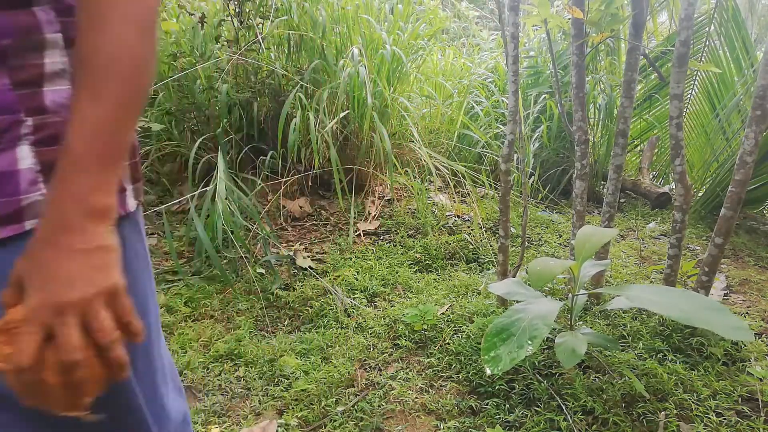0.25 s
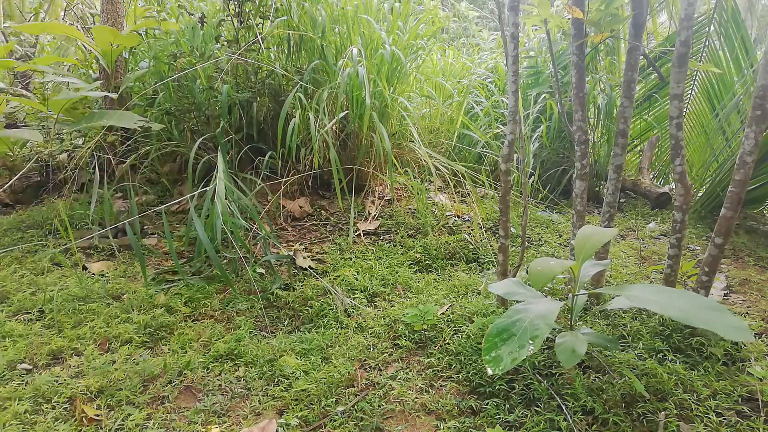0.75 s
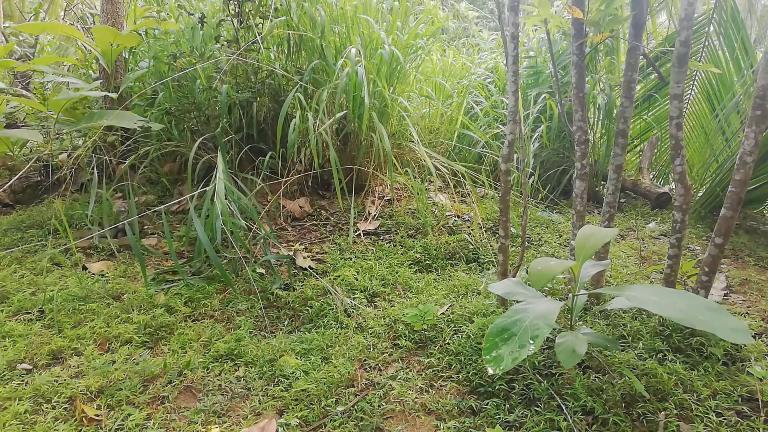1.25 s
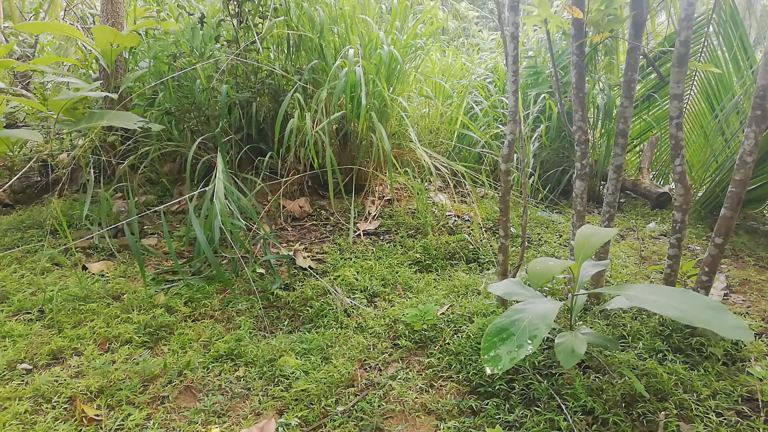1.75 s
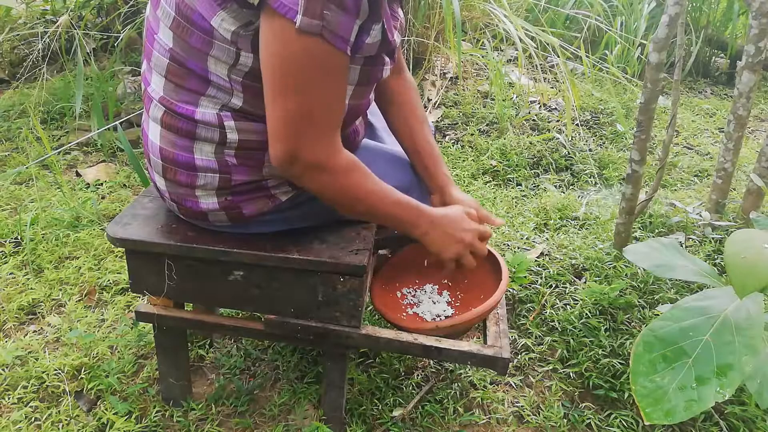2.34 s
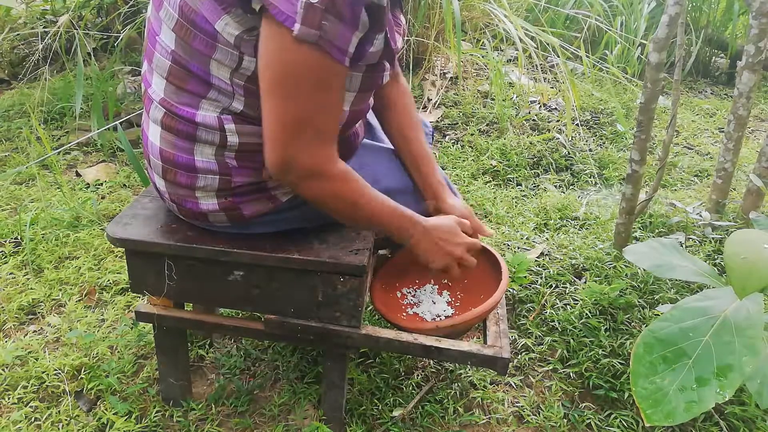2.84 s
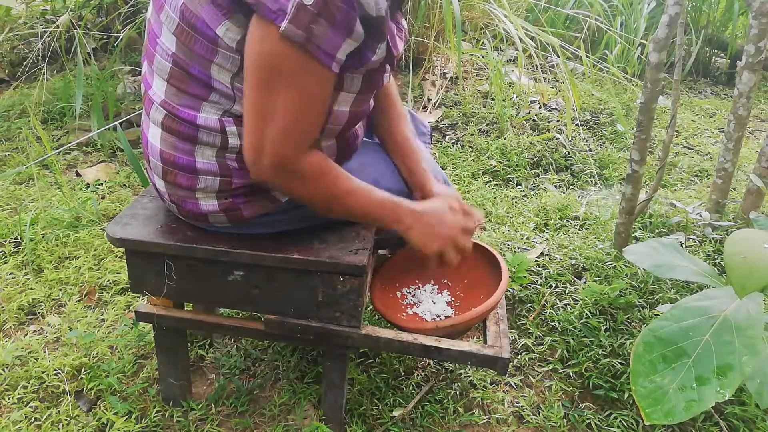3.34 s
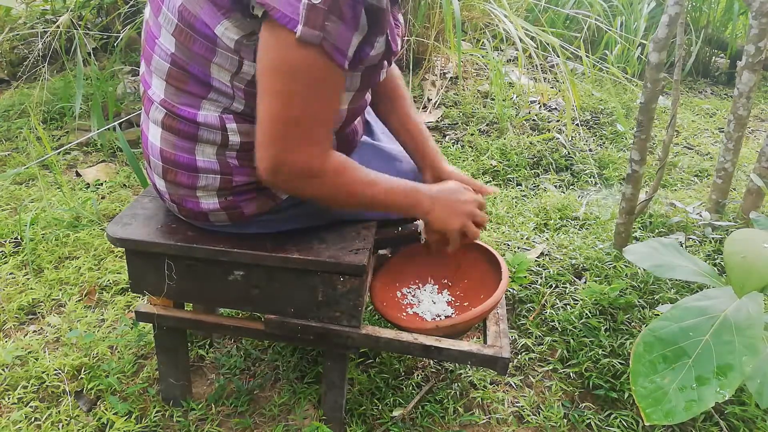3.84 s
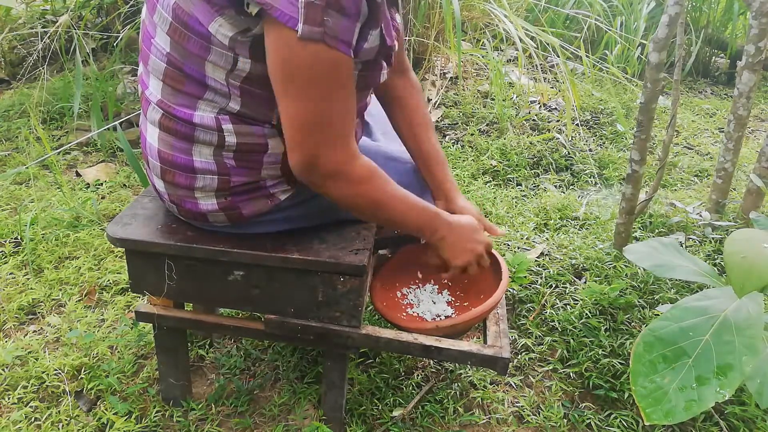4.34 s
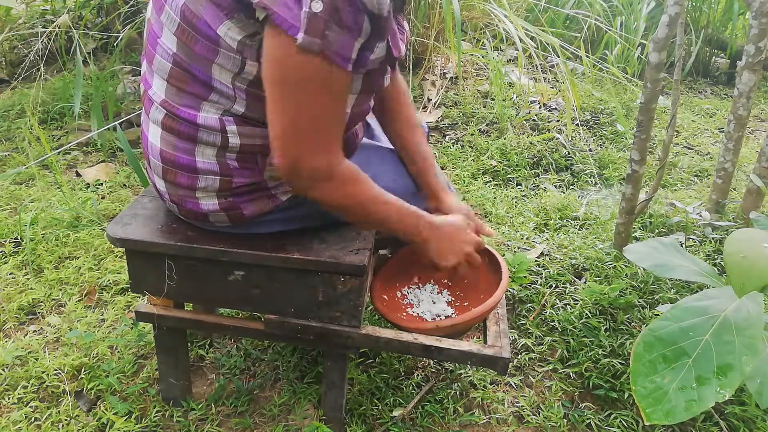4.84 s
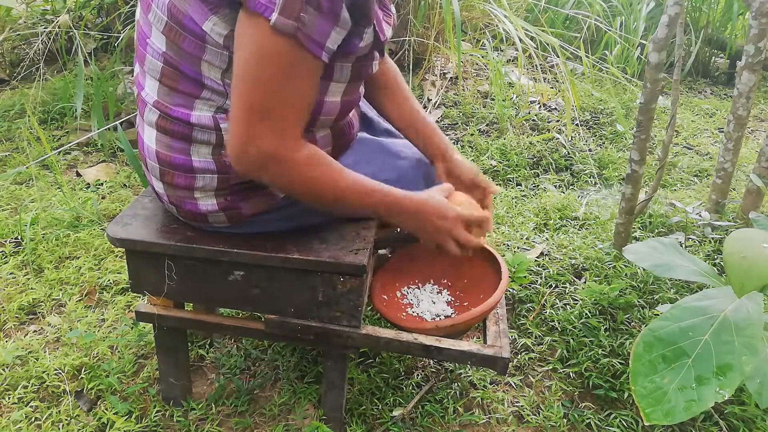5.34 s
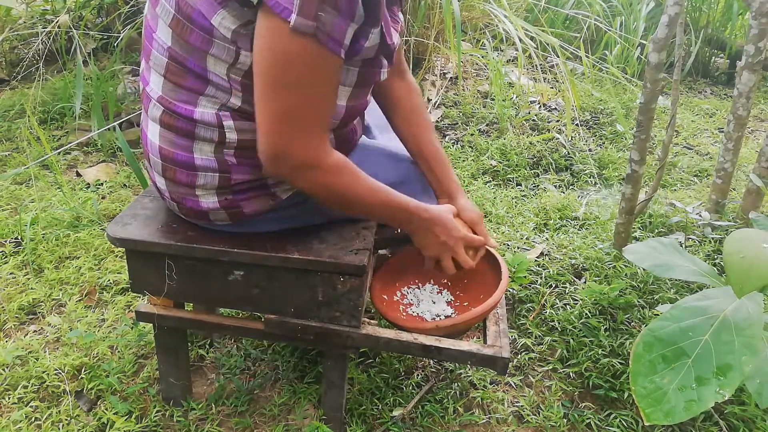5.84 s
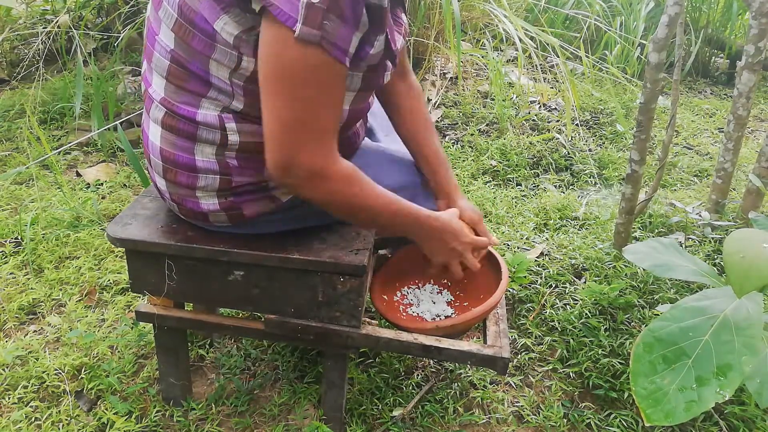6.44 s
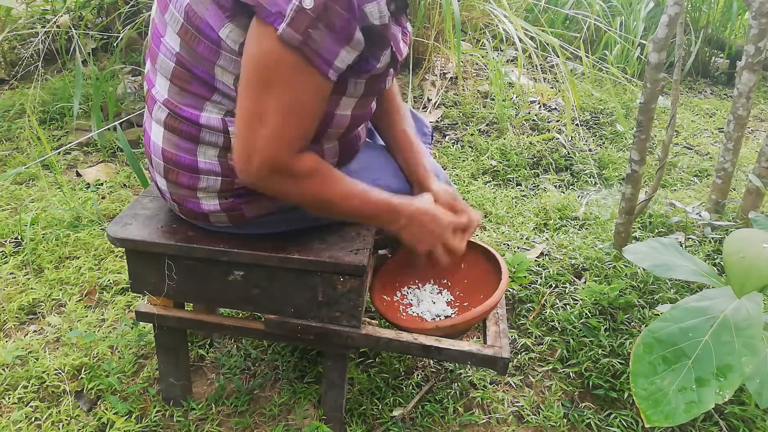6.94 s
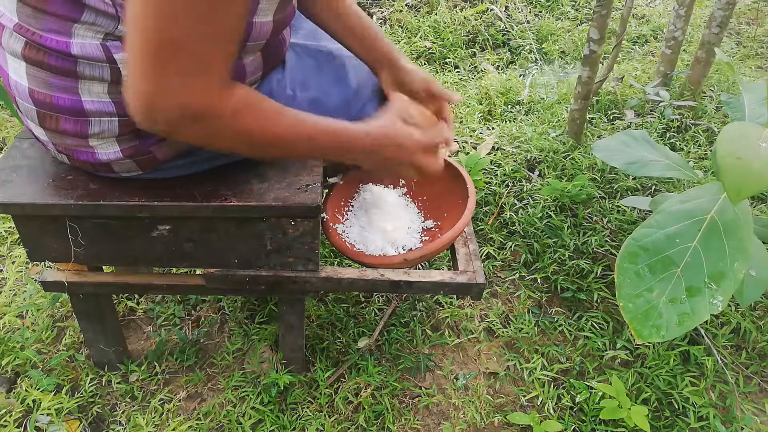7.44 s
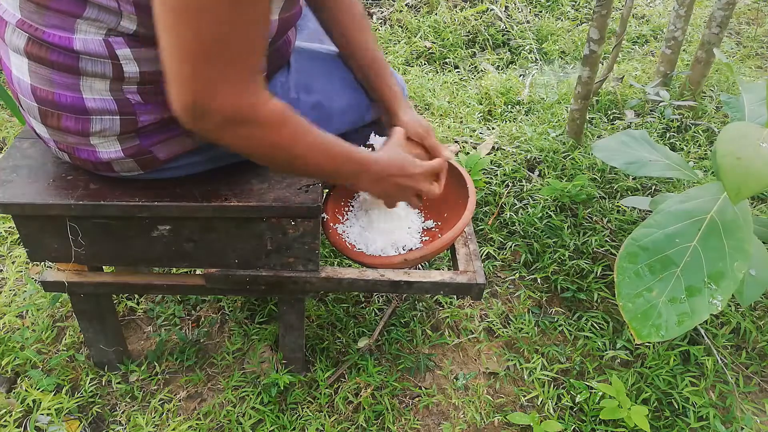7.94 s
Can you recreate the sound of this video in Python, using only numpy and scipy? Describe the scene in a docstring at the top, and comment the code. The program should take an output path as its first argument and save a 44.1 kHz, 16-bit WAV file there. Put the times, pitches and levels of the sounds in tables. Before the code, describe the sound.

A coconut half is grated on a toothed blade in steady rasping strokes with small knocks, over faint garden air.

```python
"""Half a coconut is grated on the toothed blade of a low wooden bench, about 3.5 strokes a second, in
three bouts. Fibres fracture in a dense train of impulses, coloured by the resonances of shell, blade and
bench. In each stroke the shell touches the teeth, the bench shudders and the blade judders with a knock;
harder strokes bite sooner. Twice the slipping shell squeaks. Before the work, steps rustle in the grass;
the garden's low rumble, leaf hiss and thin far whistles lie behind."""
import sys
import numpy as np
from scipy import signal
from scipy.fft import rfft, irfft, next_fast_len
from scipy.io import wavfile
from scipy.ndimage import uniform_filter1d

SR = 44100
rng = np.random.default_rng(int(sys.argv[2]) if len(sys.argv) > 2 else 0)


def generate_wav(sig):
    """Save sig (samples, or channels by samples) to the path in sys.argv[1] as 16-bit PCM at SR."""
    pcm = np.round(np.clip(np.atleast_2d(sig).T, -1, 1) * 32767).astype(np.int16)
    wavfile.write(sys.argv[1], SR, pcm)


N = 361619
T = np.arange(N) / SR
FFT_SIZE = next_fast_len(N + 8192)
FFT_SIZE += FFT_SIZE % 2
HZ = np.maximum(np.arange(FFT_SIZE // 2 + 1) * SR / FFT_SIZE, 1)


def undb(db):
    """Amplitude ratio of a level."""
    return 10 ** (np.asarray(db) / 20)

def unit(x):
    """Normalisation to rms 1."""
    return x / np.sqrt(np.mean(x ** 2))

def bell(s, width_s):
    """Gaussian envelope centred on time s."""
    return np.exp(-((T - s) / width_s) ** 2)

def curve(points):
    """Interpolation of (f/Hz, value) points in log frequency."""
    hz, value = np.transpose(points)
    return np.interp(np.log(HZ), np.log(hz), value)

def filtered(x, gain):
    """Linear filtering as a product of spectra."""
    return irfft(rfft(x, FFT_SIZE) * gain, FFT_SIZE)[..., :N]

def lowpass(hz, order=4):
    """Low-pass magnitude response."""
    return 1 / (1 + (HZ / hz) ** order)

def spread(pair, correlation):
    """Sum and difference of two independent signals set the left-right correlation."""
    c = np.clip(curve(correlation), -1, 1)
    mid, side = filtered(pair, np.sqrt(np.array([1 + c, 1 - c]) / 2))
    return np.array([mid + side, mid - side])

def sides(pan_db):
    """Channel gains for a pan, the level difference left minus right."""
    return undb(np.array([[1], [-1]]) * pan_db / 2)

def add(out, s, sound):
    """Superposition of a sound starting at time s."""
    i = int(s * SR)
    out[..., i:i + sound.shape[-1]] += sound[..., :N - i]

def wander(rate):
    """Random modulation: values held 1 / rate s and smoothed twice, deviation near 1."""
    hold = max(int(SR / rate), 1)
    held = np.repeat(rng.standard_normal(N // hold + 1), hold)
    return 1.32 * uniform_filter1d(uniform_filter1d(held, hold), hold)[:N]

def shot_noise(rate, scatter_db):
    """Two independent Poisson trains of snaps of uneven size."""
    snaps = rng.random((2, N)) < rate / SR
    size = undb(scatter_db * np.minimum(rng.exponential(size=(2, N)), 4))
    return unit(snaps * size * np.sign(rng.standard_normal((2, N))))

def mode(t, hz, t60):
    """Free vibration of a damped oscillator, falling 60 dB in t60 seconds."""
    return np.sin(2 * np.pi * hz * t) * np.exp(-np.log(1000) * t / t60)


# spectrum of the garden air: f/Hz, relative level/dB
AIR_SPECTRUM = [(25, -6.5), (45, 1), (85, 1.5), (165, -7), (270, -15.5), (500, -16), (800, -13.5),
                (1600, -17), (4300, -20), (6000, -23.5), (8300, -24), (11000, -29), (15500, -36)]
# its left-right likeness: f/Hz, correlation
AIR_CORRELATION = [(110, 1), (210, 0.94), (380, 0.21), (650, -0.64), (1300, -0.088)]
# its balance: f/Hz, pan/dB
AIR_PAN = [(380, 0), (700, 4), (1250, -1), (4400, 2), (8200, 4.5), (12000, -3)]
# steady stretches: start t/s, rumble level/dB, hiss level/dB
GARDEN_LEVELS = [(0, -58.5, -59), (1.976, -57.5, -56.5), (3.4, -55.5, -55), (5.1, -57.2, -55),
                 (7.35, -58, -59)]

def garden(crossover_hz=260, dip_s=1.976, dip_width_s=0.006, dip_db=-44):
    """Modulated broadband noise: a restless rumble under leaf hiss. The level dips briefly once."""
    starts, rumble_db, hiss_db = np.transpose(GARDEN_LEVELS)
    stretch = np.searchsorted(starts[1:], T)
    air = spread(rng.standard_normal((2, N)), AIR_CORRELATION)
    colour = undb(curve(AIR_SPECTRUM)) * sides(curve(AIR_PAN))
    low = lowpass(crossover_hz)
    rumble = unit(filtered(air, colour * low)) * undb(rumble_db[stretch] + 1.3 * wander(12))
    hiss = unit(filtered(air, colour * (1 - low))) * undb(hiss_db[stretch] + 0.36 * wander(5.6))
    return (rumble + hiss) * undb(dip_db * bell(dip_s, dip_width_s))


# rustles underfoot: t/s, width/s, level/dB
FOOTSTEPS = [(.025, 0.0067, -56.5), (0.591, .04, -66), (.933, 0.0066, -53), (.95, .025, -61.5),
             (1.2, .05, -60.5)]

def steps():
    """Band-limited shot noise: grass blades crackle faintly underfoot."""
    swell = sum(undb(db) * bell(s, width) for s, width, db in FOOTSTEPS)
    band = lowpass(11000) * (1 - lowpass(4800, order=2))
    return swell * unit(filtered(shot_noise(rate=1000, scatter_db=3.5), band))


# strokes: knock t/s, force level/dB, lag from knock to fastest tearing/s, rasp level/dB
STROKES = [(2.2801, -9, .006, -40.5), (2.561, -10.5, 0.0039, -39.5), (2.8439, -4.5, -0.0051, -39),
           (3.1051, -7.5, .018, -37.5), (3.383, -6.5, 0.013, -37.5), (3.6558, -1.5, 0.019, -38.5),
           (3.9452, -.5, 0.016, -38), (4.2323, -8, 0.039, -38.5), (4.5139, 0.5, 0.025, -39),
           (4.797, 0.5, 0.024, -39.5), (5.5514, -11, -0.03, -39), (5.8165, -10.5, 0.004, -39),
           (6.0884, -4.5, 0.016, -38.5), (6.3893, .5, 0.00027, -38.5), (6.6772, -1, 0.0068, -38.5),
           (6.9891, 3.5, -0.00088, -38.5), (7.6225, -10, -0.02, -42.5), (7.916, -25, -.013, -42.5),
           (8.1773, -2.5, 0.016, -41.5)]
# bouts: start t/s, stroke length/s, relative treble level/dB, relative bass level/dB,
# shudder level/dB, lead of shudder over knock/s, knock pan/dB
BOUTS = [(2.1, 0.16, -8, -2, -25, .011, 5), (5.3, 0.16, -9.5, -3, -34.5, .02, 5),
         (7.4, 0.18, -3, 2.5, -39, .006, 9)]

def rasp(tooth_hz=300, tooth_db=1.87, bass_lead_s=0.008, bite_power=2.43, level_db=4.5, treble_lift_db=9):
    """Fracture as amplitude-modulated shot noise: fibres snap in clusters as the teeth catch."""
    low, mid, high, stall_db = np.zeros((4, N))
    for knock_s, force_db, lag_s, db, (length_s, treble_db, bass_db, *_) in strokes():
        # the harder the stroke, the quicker the teeth bite and the more gradually they let go
        rise_s = length_s * np.clip(0.29 - 0.05 * force_db, .1, .5)
        peak_s, fall_s = knock_s + lag_s, length_s - rise_s
        biting = np.clip((peak_s - T) / rise_s, 0, 3) ** bite_power
        releasing = np.clip((T - peak_s) / fall_s, 0, 3) ** 2
        swing_db = -20 * (biting + releasing)
        low += undb(db + bass_db + 1.09 * swing_db)
        mid += undb(db + swing_db)
        high += undb(db + treble_db + 1.01 * swing_db)
        # the tearing stalls while the blade judders
        stall_db -= 7.5 * undb(force_db) * bell(knock_s + 0.0055, width_s=0.0038)
    low = np.interp(T + bass_lead_s, T, low)  # the bench feels the push before the tearing peaks
    catch_db = .7 * wander(90)
    snaps = turning_shell(shot_noise(rate=12000, scatter_db=1.5))
    snaps *= undb(tooth_db * wander(tooth_hz) + catch_db)
    bass, body = lowpass(830), lowpass(7000)
    thrum = low * filtered(snaps, bass)
    scrape = mid * undb(0.46 * stall_db) * filtered(snaps, body - bass)
    crackle = high * undb(stall_db) * filtered(snaps, 1 - body)
    return undb(level_db) * (thrum + scrape + undb(treble_lift_db) * crackle)

def strokes():
    """Each stroke's row, then its bout's stroke length, brightness, bass, shudder and pan."""
    bout = np.searchsorted([row[0] for row in BOUTS], [row[0] for row in STROKES]) - 1
    return [(*stroke, BOUTS[k][1:]) for stroke, k in zip(STROKES, bout)]

def turning_shell(x, depth_db=3.0):
    """Time-varying filtering: narrow resonances come and go as the shell turns in the hands."""
    spectra = signal.stft(x, nperseg=512)[2]
    ripple = uniform_filter1d(rng.standard_normal(spectra.shape[1:]), size=3, axis=0)  # over frequency
    ripple = uniform_filter1d(ripple, size=7, axis=1)  # over time
    return signal.istft(spectra * undb(depth_db * unit(ripple)))[1][:, :N]


# spectrum of tearing flesh: f/Hz, level/dB
TEAR_SPECTRUM = [(60, -12.5), (130, 5), (220, 3.5), (340, 3.5), (550, 7), (700, 2.5), (1300, 0), (2600, 0),
                 (5200, -3), (7300, -8.5), (9500, -9), (12500, -14), (16000, -27)]
# resonances of shell, blade and bench: f/Hz, bandwidth/Hz, peak level/dB
RESONANCES = [(273, 81, 9.5), (413.3, 29, 7.5), (496, 127, 7), (750, 76, 2.5), (923, 56, 5), (1222, 110, 9),
              (1510, 63, 5.5), (1955, 100, 8.5), (2398, 79, 6.5), (2966, 64, 6.5), (3490, 54, 7),
              (3737, 80, 8), (4710, 290, 3), (6050, 790, 3), (10900, 500, 1.5)]
# balance of the tearing: f/Hz, pan/dB
TEAR_PAN = [(300, 0), (520, 1.5), (700, 6), (930, 6), (1200, 1.5), (1500, -2.5), (2000, -2), (2350, 3.6),
            (3600, -2), (5000, -1), (6200, 4), (9500, 2), (11500, -7), (15000, -11)]
# its left-right likeness: f/Hz, correlation
TEAR_CORRELATION = [(150, 1), (500, 0.37), (1300, 0.87), (2500, 0.5), (5000, 0.41), (8000, 0.21),
                    (12000, 0)]

def scraper_response(force):
    """Source and filter: the resonances of shell, blade and bench colour whatever the teeth tear."""
    peaks_db = sum(db / (1 + (2 * (HZ - hz) / width) ** 2) for hz, width, db in RESONANCES)
    response = minimum_phase(curve(TEAR_SPECTRUM) + peaks_db) * sides(curve(TEAR_PAN))
    return filtered(spread(force, TEAR_CORRELATION), response)

def minimum_phase(db):
    """Causality: folding the cepstrum gives a response whose peaks ring after the blow."""
    cepstrum = irfft(np.log(undb(db)), FFT_SIZE)
    cepstrum[1:FFT_SIZE // 2] *= 2
    cepstrum[FFT_SIZE // 2 + 1:] = 0
    return np.exp(rfft(cepstrum))


# the shell bumps on the teeth: t/s, crunch level/dB, shell ring level/dB, bench shudder level/dB
BUMPS = [(2.768, -40, -33, -30), (3.682, -36, -29, -47), (5.083, -44, -37.5, -37), (5.239, -46, -60, -39),
         (5.428, -36, -18, -47), (5.507, -35.5, -35, -44), (5.569, -32.5, -29.5, -42),
         (5.708, -48, -51, -54), (5.832, -29.5, -42, -44), (7.504, -45.5, -57, -58), (7.849, -37, -42, -50)]

def crunches(decay_s=0.0055, level_db=6):
    """Transient fracture: each contact breaks a few fibres at once in a decaying noise burst."""
    envelope, fade = np.zeros(N), np.exp(-T[:SR // 20] / decay_s)
    for s, db, _ in contacts():
        add(envelope, s, undb(db) * fade)
    return undb(level_db) * envelope * rng.standard_normal((2, N))

def contacts(lead_s=.0535, crunch_db=-48.5, ring_db=-54):
    """The bumps and a light touch before each knock: t/s, crunch level/dB, ring level/dB."""
    return [row[:3] for row in BUMPS] + [(s - lead_s, crunch_db, ring_db) for s, *_ in STROKES]


# modes of the hollow half shell, damped by the hands: f/Hz, t60/s, level/dB
SHELL_MODES = [(431, 0.041, -8), (730, 0.02, -2.5), (1180, 0.025, 1), (1420, .022, -4),
               (2110, 0.016, -10.5)]

def shell_taps(contact_s=0.00085, detune=0.043, pan_db=2, level_db=-2):
    """Impact excitation: the shell's modes ring at each contact, tuned a little differently each time."""
    out, t, touches = np.zeros(N), T[:SR // 20], contacts()
    onset = 1 - np.exp(-t / contact_s)
    for s, _, ring_db in touches:
        tuning = 1 + detune * rng.standard_normal(len(SHELL_MODES))
        ring = sum((-1) ** k * undb(db) * mode(t, hz * tuning[k], t60)
                   for k, (hz, t60, db) in enumerate(SHELL_MODES))
        add(out, s, undb(ring_db) * ring * onset)
    return undb(level_db) * sides(pan_db) * out


# modes of bench and blade: f/Hz, t60/s, level/dB, pan/dB
BENCH_MODES = [(195, 0.035, -20, 6), (262, 0.12, -14, 0.5), (385.4, 0.095, -16, -0.5), (493, 0.061, -14, 8),
               (748, 0.023, -24.5, 33), (981, 0.085, -10, 5.5), (1120, 0.042, -17, -19),
               (1550, .03, -60.5, -26), (1965, 0.023, -13.5, -7), (2350, 0.021, -17.5, -2)]

def bench_ring(damping):
    """Modal superposition: bench and blade after one blow, neighbouring modes in opposite phase."""
    return sum((-1) ** k * sides(pan) * undb(db) * mode(T[:SR // 6], hz, t60 / damping)
               for k, (hz, t60, db, pan) in enumerate(BENCH_MODES))

def shudders(slip_s=0.00331, swell_s=0.008, push_s=0.0017, force_power=1.4, level_db=7):
    """A soft contact is a low-pass filter: slips swell and fade, waking the bench's low modes."""
    out, push = np.zeros((2, N)), signal.windows.hann(int(push_s * SR))
    thud = signal.fftconvolve(bench_ring(damping=1.27), push[None] / push.sum())
    before_knocks = [(s - lead_s, db + force_power * force_db)
                     for s, force_db, _, _, (*_, db, lead_s, _) in strokes()]
    at_bumps = [(s, db) for s, _, _, db in BUMPS]
    for s, db in before_knocks + at_bumps:
        for offset in slip_s * (np.arange(-4, 3) + 0.16 * rng.standard_normal(7)):
            swell = np.exp(-((offset + slip_s) / swell_s) ** 2)
            add(out, s + offset, undb(db + level_db) * swell * thud)
    return out

def knocks(judder_hz=990, judder_s=0.00371, judder_db=-15, ring_db=-20, bounce_s=.0066, bounce_gain=.35):
    """Impact and rebound: the blade judders a few cycles, sets the bench ringing and bounces once."""
    out, ring = np.zeros((2, N)), bench_ring(damping=1.0) * undb(ring_db)
    t = T[:int(judder_s * SR)]
    envelope = signal.windows.tukey(len(t), .3) * np.exp(-t / .02)
    for s, db, _, _, (*_, pan_db) in strokes():
        pitch, timing, strength = rng.standard_normal(3)
        judder = envelope * np.sin(2 * np.pi * judder_hz * (1 + 0.016 * pitch) * t)
        add(out, s, undb(db + judder_db) * sides(pan_db) * judder)
        add(out, s + judder_s / 2, undb(db) * ring)
        add(out, s + bounce_s * (1 + 0.059 * timing), undb(db + 2 * strength) * bounce_gain * ring)
    return out


# thin far whistles: t/s, width/s, f/Hz, level/dB
WHISTLES = [(2.42, 0.077, 4420, -67), (3.0, 0.091, 4700, -69), (3.26, 0.09, 4640, -63),
            (7.5, .045, 5700, -65), (7.75, 0.055, 3640, -66.5)]

def whistles(waver=0.0216, drift=.01, flutter_db=3):
    """Random frequency and amplitude modulation makes thin, distant tones waver."""
    warped_t = np.cumsum(1 + waver * wander(500) + drift * wander(25)) / SR
    tones = sum(undb(db) * bell(s, width) * np.sin(2 * np.pi * hz * warped_t)
                for s, width, hz, db in WHISTLES)
    return tones * undb(flutter_db * wander(76))


# squeaks as the teeth let go: t/s, f/Hz, level/dB
SQUEAKS = [(4.298, 1430, -43), (4.868, 1430, -43)]

def squeaks(width_s=.017, waver=.04, flutter_db=4.0):
    """Friction-excited vibration: the slipping shell sings for a moment on one rough note."""
    warped_t = np.cumsum(1 + waver * wander(600)) / SR
    notes = sum(undb(db) * bell(s, width_s) * np.sin(2 * np.pi * hz * warped_t) for s, hz, db in SQUEAKS)
    return notes * undb(flutter_db * wander(300))


def scene():
    """Superposition of the scraper close by and the open garden."""
    tearing = scraper_response(rasp() + crunches())
    scraper = tearing + shell_taps() + knocks() + shudders() + squeaks()
    return scraper + steps() + whistles() + garden()

def record(dry, cutoff_hz=15800):
    """Band limiting: a steep elliptic low-pass cuts the top."""
    return signal.sosfilt(signal.ellip(10, .2, 80, cutoff_hz, fs=SR, output="sos"), dry)


dry = scene()
out = record(dry)
generate_wav(out)
```